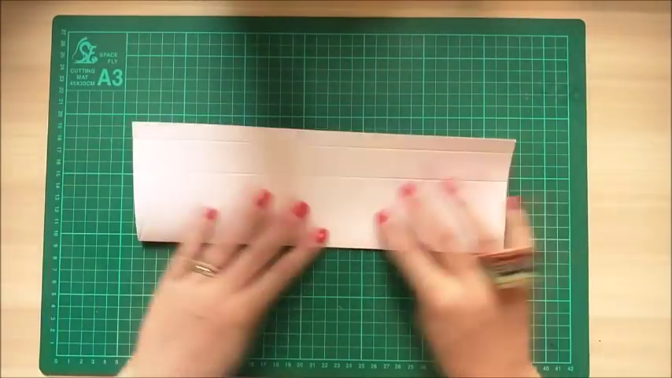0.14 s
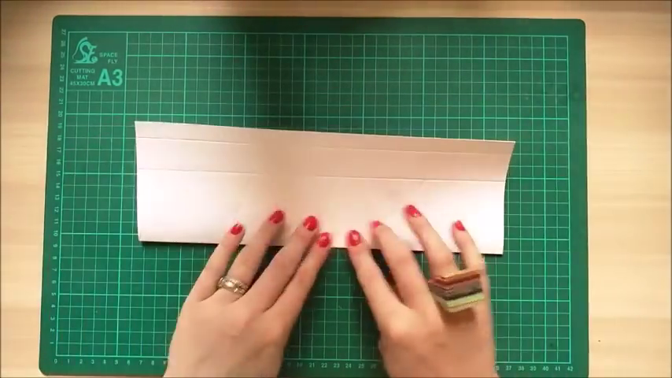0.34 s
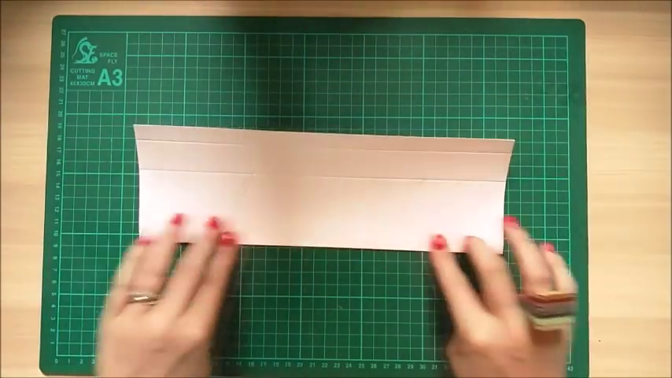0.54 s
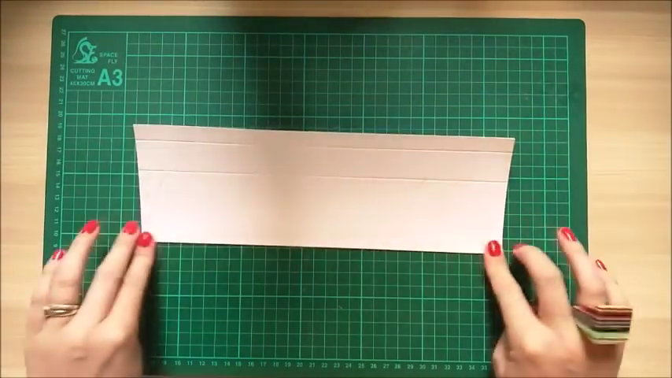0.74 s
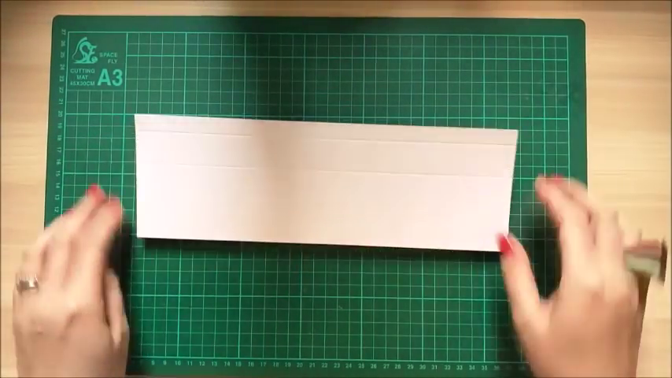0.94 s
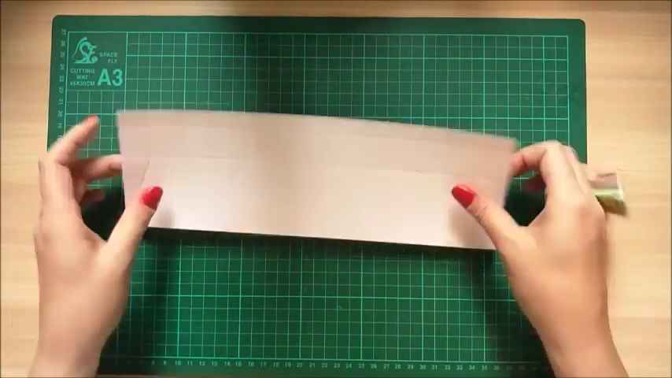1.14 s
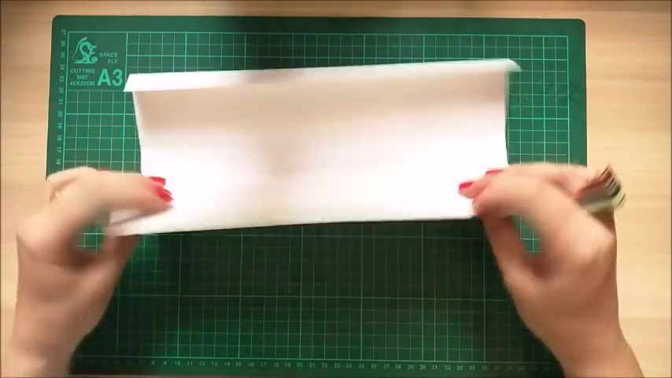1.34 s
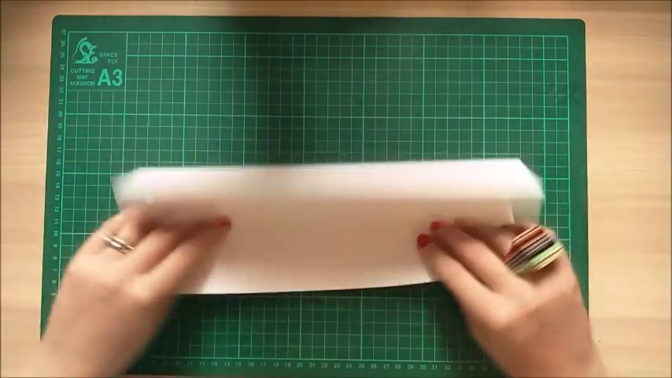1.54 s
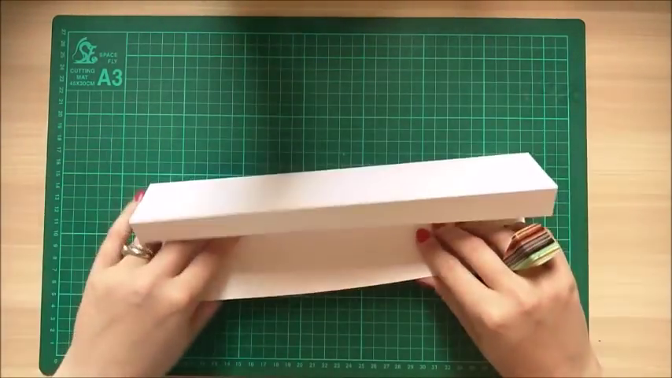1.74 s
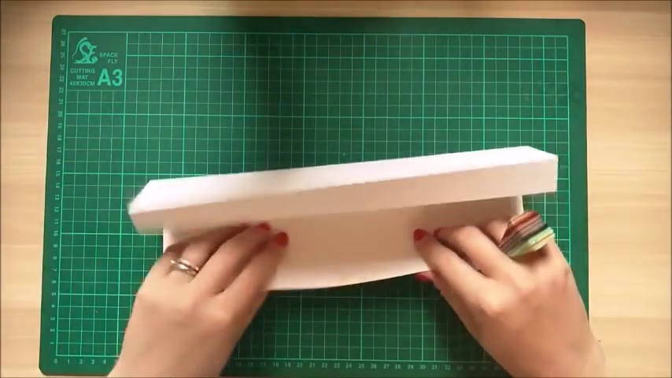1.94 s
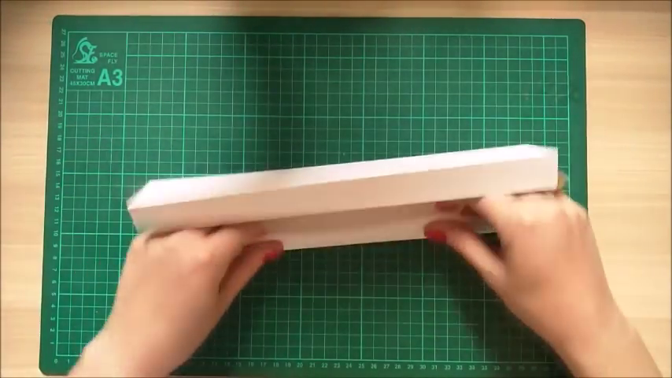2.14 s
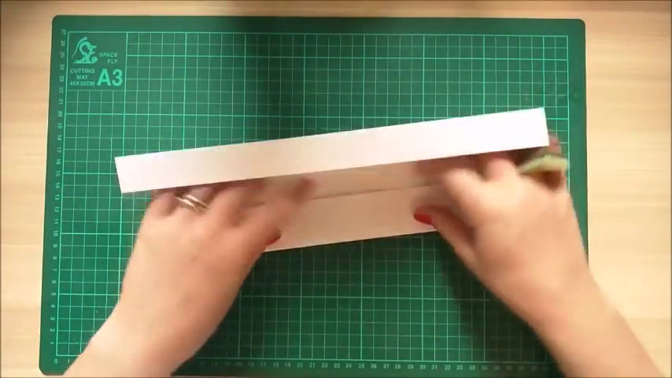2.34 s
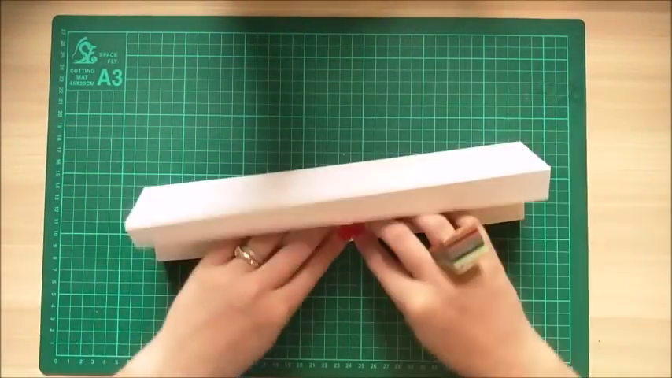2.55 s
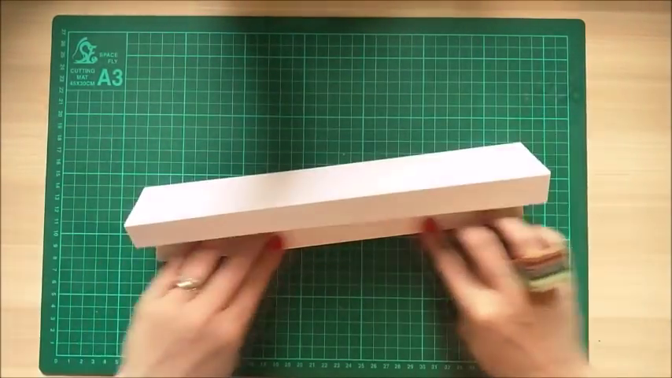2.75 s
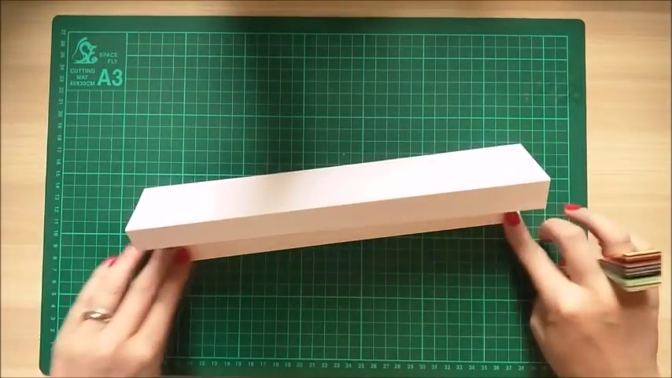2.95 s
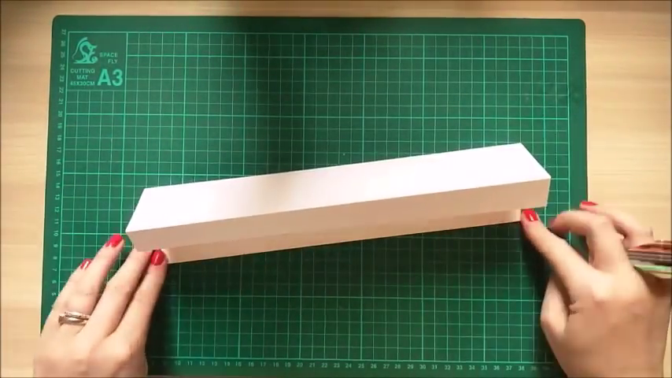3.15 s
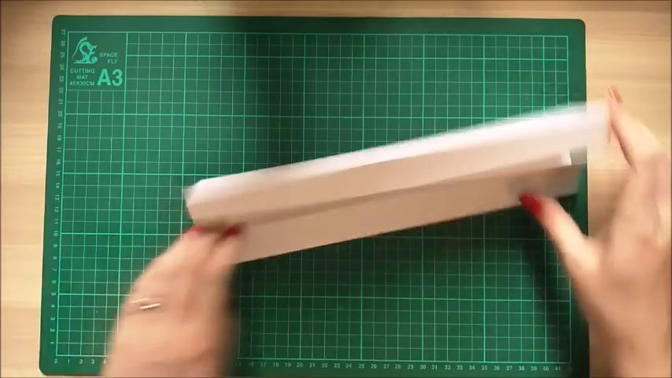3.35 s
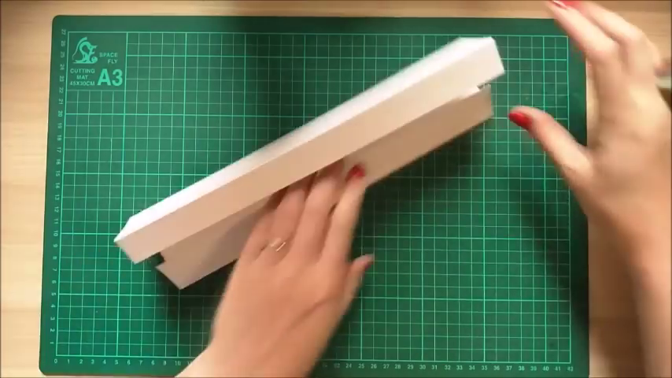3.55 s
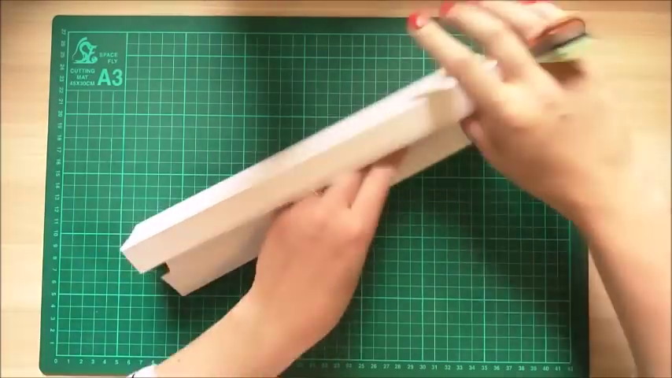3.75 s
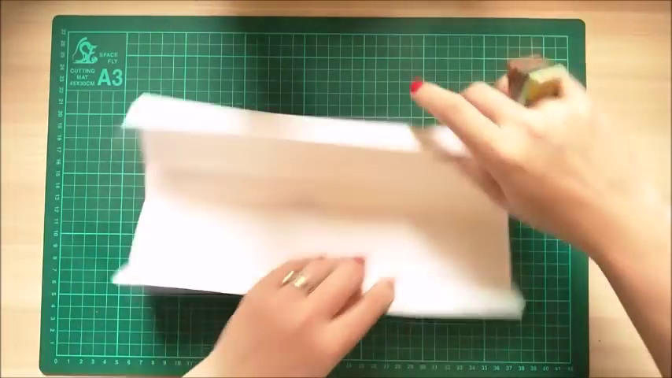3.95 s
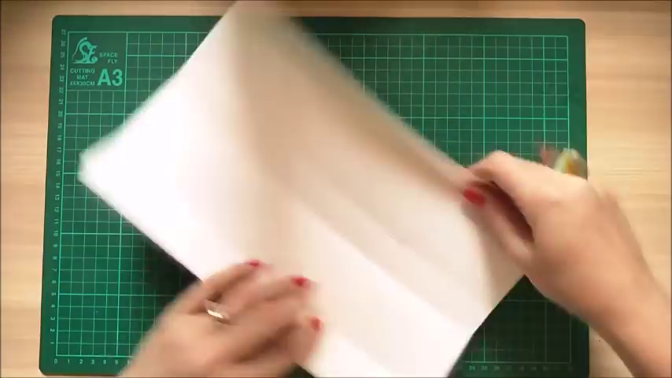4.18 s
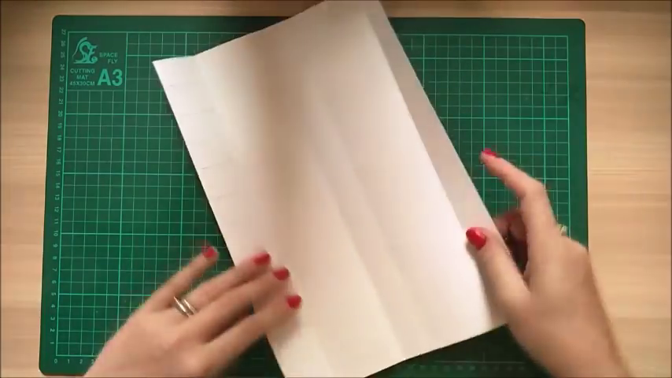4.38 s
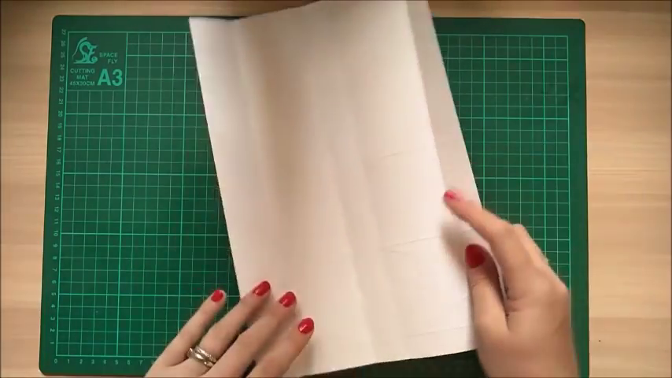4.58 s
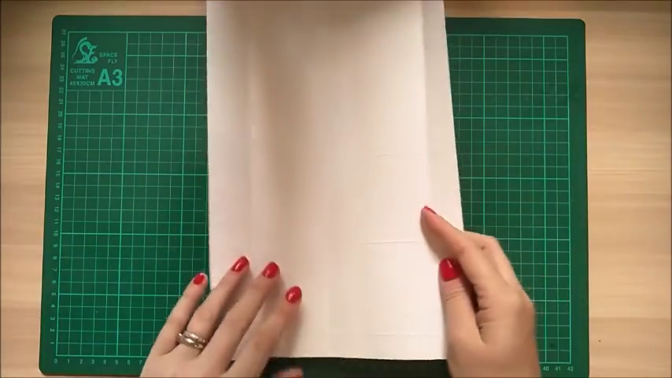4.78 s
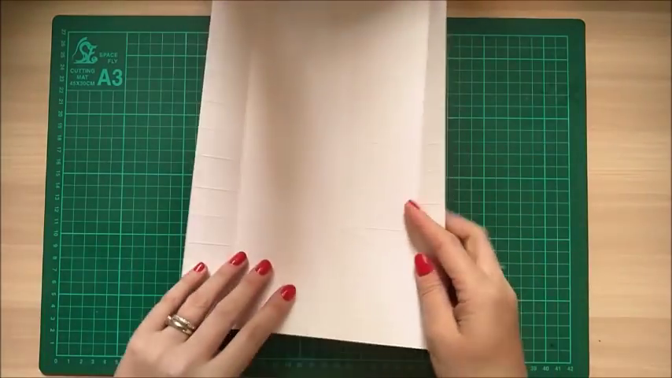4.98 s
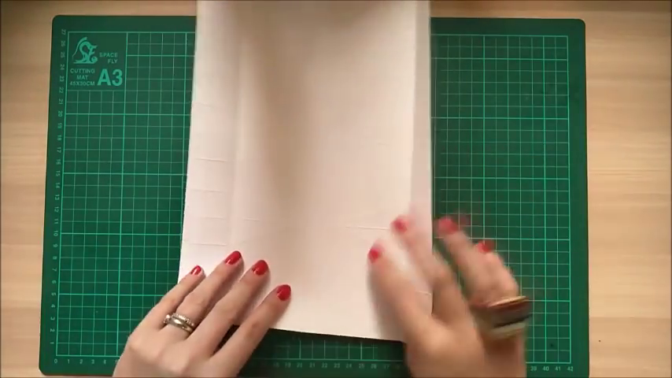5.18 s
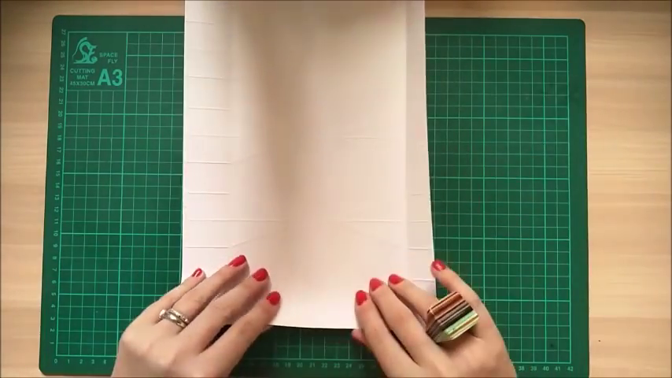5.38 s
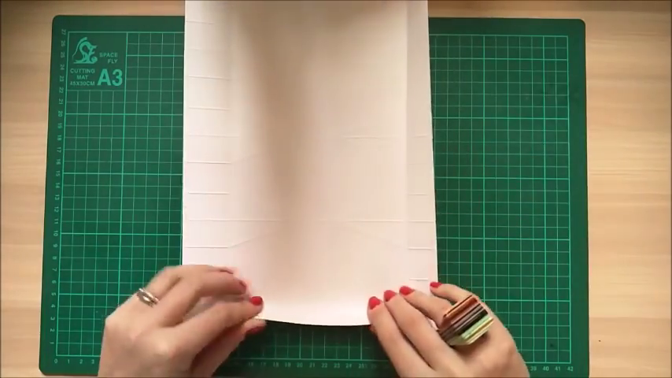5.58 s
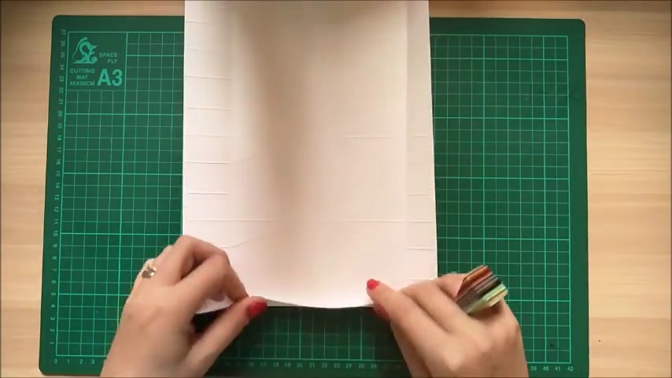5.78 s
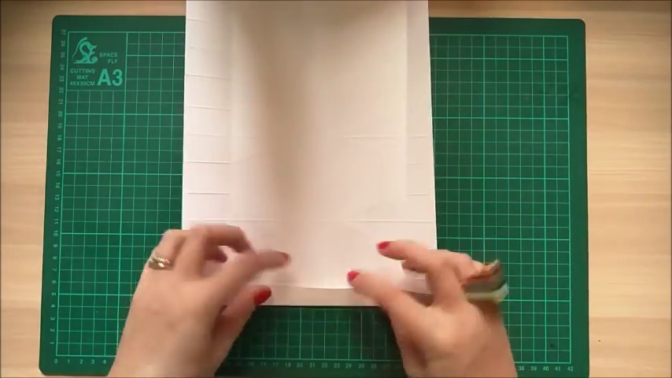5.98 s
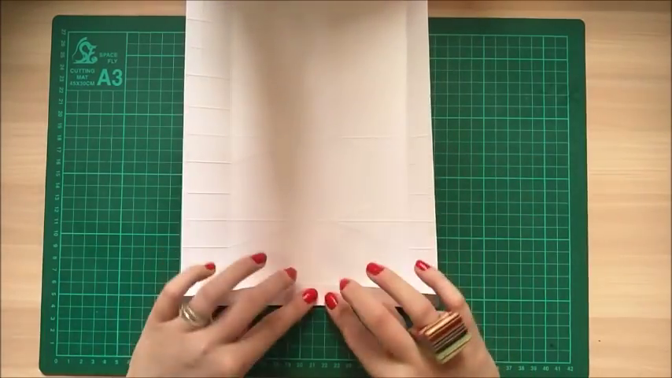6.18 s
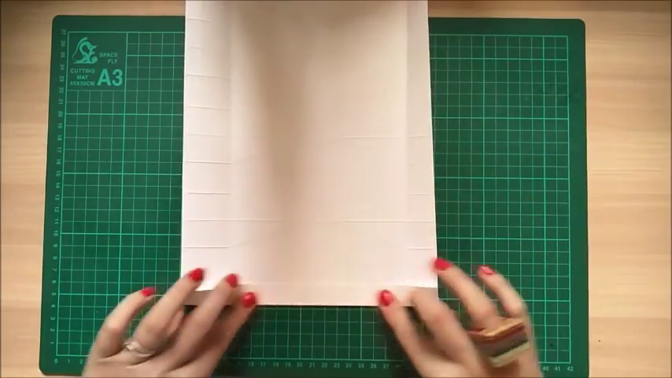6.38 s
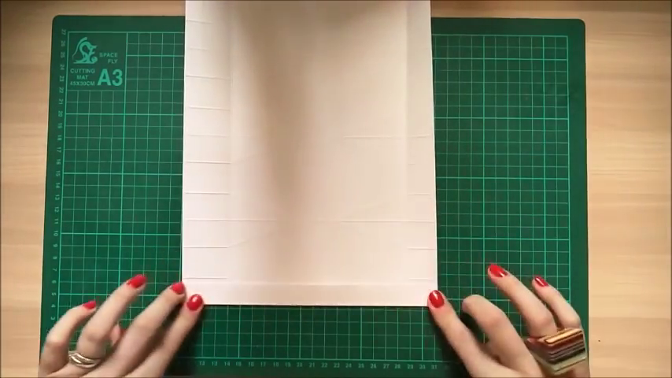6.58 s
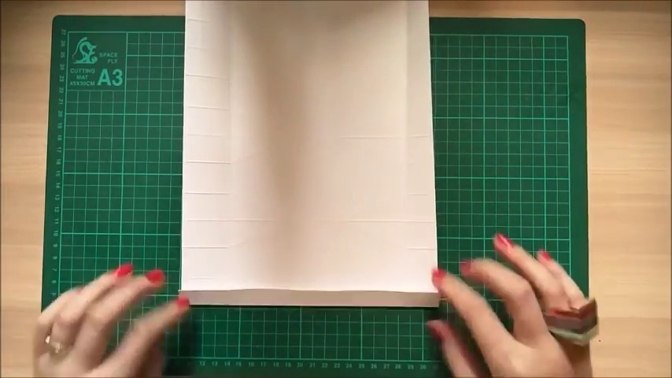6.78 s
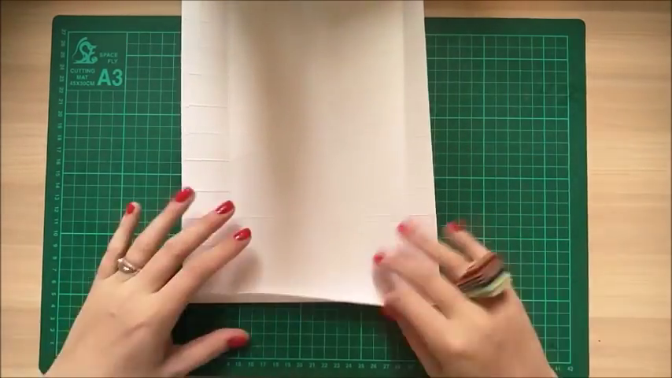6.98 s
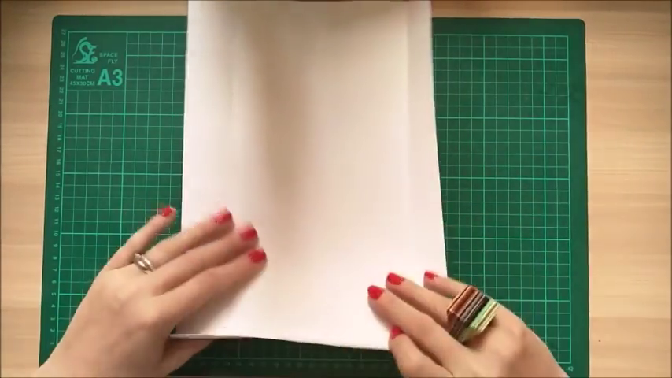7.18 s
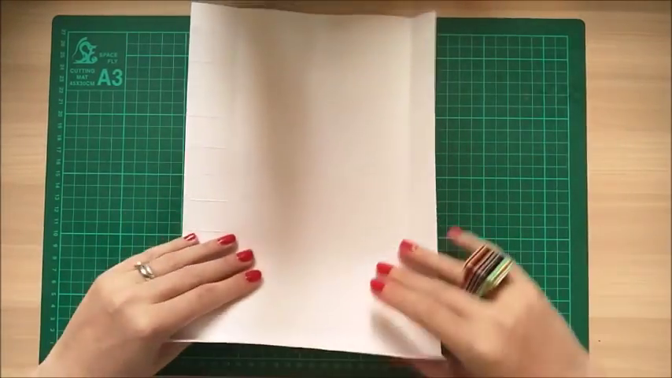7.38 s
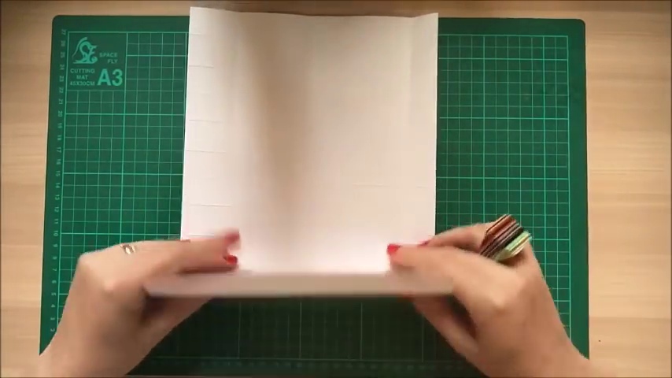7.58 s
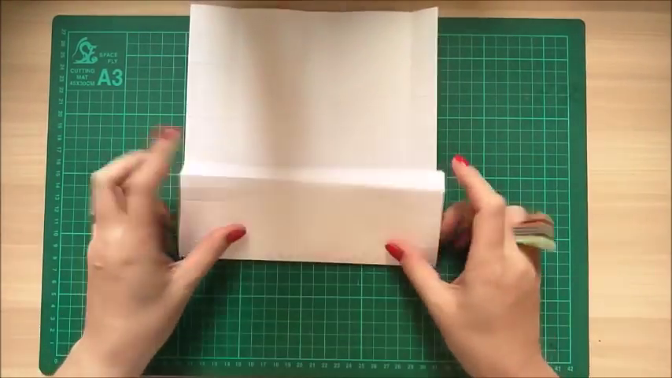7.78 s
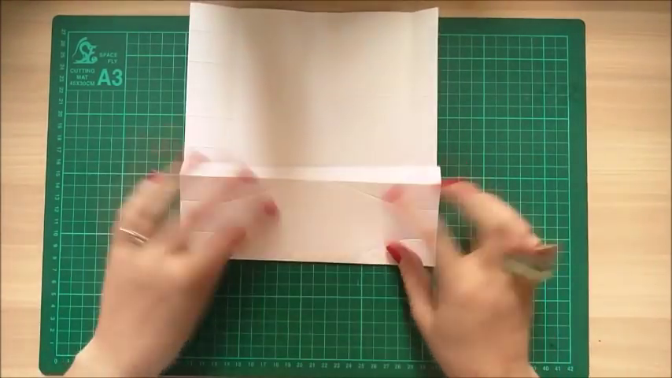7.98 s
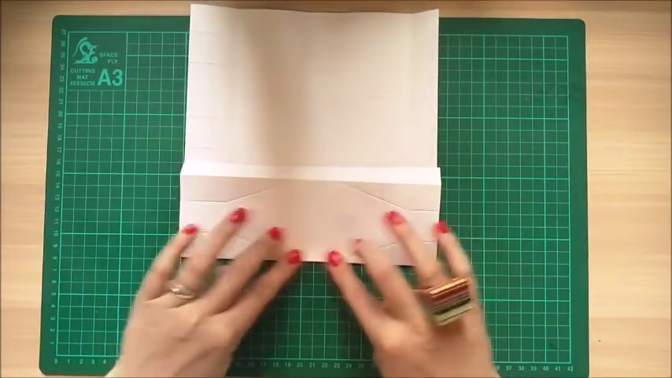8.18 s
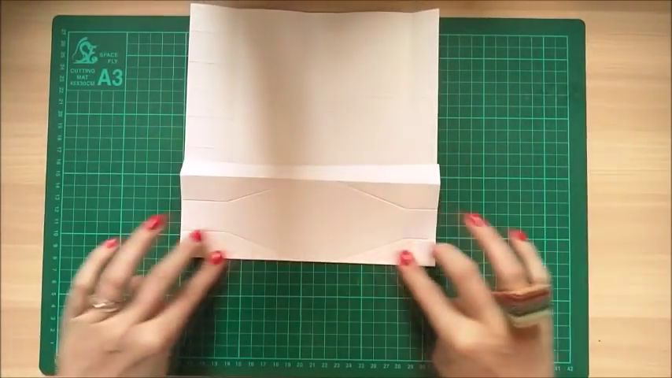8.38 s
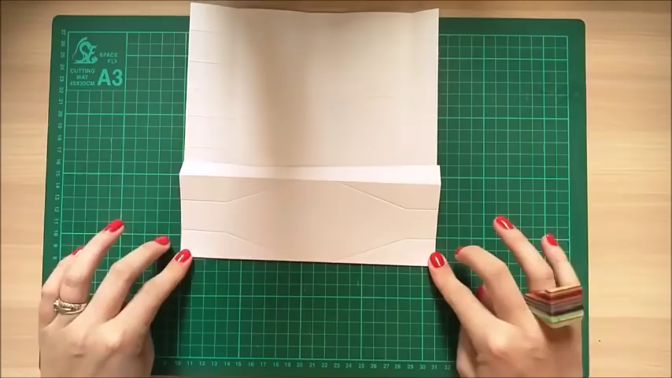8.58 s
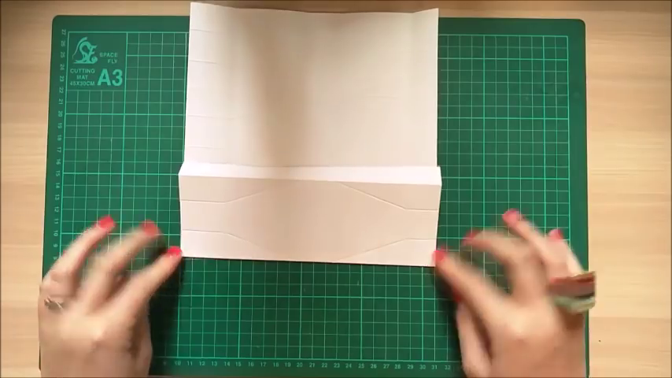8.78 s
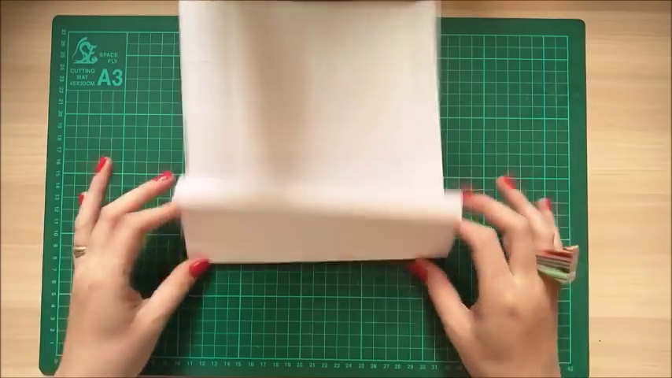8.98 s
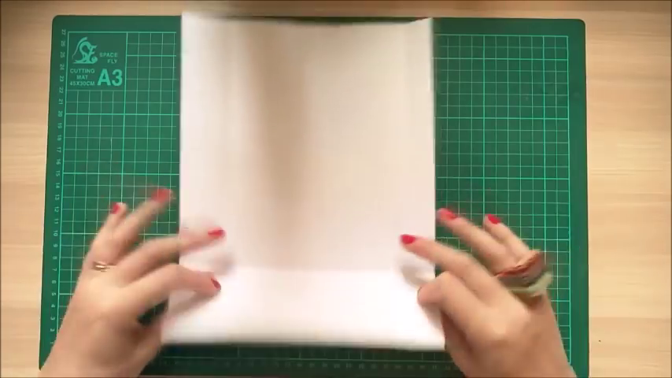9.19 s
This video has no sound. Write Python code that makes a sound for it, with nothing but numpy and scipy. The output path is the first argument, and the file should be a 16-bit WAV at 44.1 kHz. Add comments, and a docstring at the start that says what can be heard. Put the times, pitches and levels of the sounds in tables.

```python
"""Card scrapes and taps on a cutting mat, close to a stereo microphone in a small live room.
Hands fold the scored sheet: fingertips hiss along the creases, its edges catch on the mat,
and edges and fingernails tap down with a clack, a thud and a tick. Curled into an open tube,
the card rings hollow; later a folded flap colours the rubbing. Faint air noise lies underneath."""
import sys
import numpy as np
from scipy import signal
from scipy.fft import rfft, irfft
from scipy.io import wavfile
from scipy.ndimage import uniform_filter1d

SR = 44100
rng = np.random.default_rng(int(sys.argv[2]) if len(sys.argv) > 2 else 0)


def persist_wave(psi):
    """Save psi, clipped to +-1, as 16-bit WAV."""
    counts = np.round(np.clip(psi, -1, 1) * 32767).astype(np.int16)
    wavfile.write(sys.argv[1], SR, np.atleast_2d(counts).T)


N = 407043
TIME = np.arange(N) / SR
HAND_TIME = np.arange(0, N, 32) / SR  # a coarser clock for hand movements


def gain_of(db):
    """Decibels to amplitude."""
    return np.exp(np.asarray(db) * (np.log(10) / 20))


def unit_rms(x):
    """Scales to rms 1."""
    return x / np.sqrt(np.mean(x ** 2) + 1e-20)


def power_sum(*levels):
    """Amplitudes of unrelated noises, added in power."""
    return np.sqrt(sum(level ** 2 for level in levels))


def at_hz(rows, hz, column=1):
    """One column of a spectrum table, read on a log-frequency axis."""
    table = np.transpose(rows)
    return np.interp(np.log(hz + 1), np.log(table[0] + 1), table[column])


def follow(rows, column=1):
    """One column of a curve at every sample, held beyond its ends."""
    table = np.transpose(rows)
    return np.interp(TIME, table[0], table[column])


def add(mix, start_s, sound):
    """Mixes a sound in at its start time."""
    part = mix[max(round(start_s * SR), 0):][:len(sound)]
    part += sound[:len(part)]


def colour(x, spectrum, size=2048):
    """Passes x through a body that rings with the given spectrum, at minimum phase."""
    log_gain = np.log(gain_of(at_hz(spectrum, abs(np.fft.fftfreq(size, 1 / SR)))))
    response = np.fft.ifft(np.exp(np.conj(signal.hilbert(log_gain)))).real
    return signal.oaconvolve(x, response)[:len(x)]


def waver(rate_hz):
    """Slow random drift of rms 1, up to about rate_hz."""
    hz = np.fft.rfftfreq(N, 1 / SR)[:1000]
    noise = rng.standard_normal((len(hz), 2)) @ [1, 1j]
    spectrum = noise / np.sqrt(1 + (hz / rate_hz) ** 4) * hz / (hz + rate_hz / 4)
    drift = unit_rms(irfft(spectrum, 8192))
    return np.interp(TIME, np.linspace(0, N / SR, len(drift)), drift)


def burst(spectrum, t60, crack=0, size=8192):
    """A contact chatters and dies away, with an optional opening crack; rms 1 over its loudest 5 ms."""
    t = np.arange(size) / SR
    force = gain_of(-60 * t / max(t60, 0.004)) + crack * np.exp(-t / 0.0015)
    chatter = rng.choice([-1, 1], size)
    for _ in range(4):  # even out spectrum and loudness in turn
        white = irfft(np.exp(1j * np.angle(rfft(chatter * force))))
        chatter = white / np.sqrt(abs(uniform_filter1d(white ** 2, size=24)) + 1e-20)
    sound = colour(chatter * force, spectrum)
    return sound / np.sqrt(uniform_filter1d(sound ** 2, size=220).max())


def friction(slips_per_s, spread_db, smooth, uneven_db):
    """Fibres catch and slip: tiny clicks of scattered size over a smooth hiss, under uneven pressure."""
    sizes = gain_of(spread_db * np.minimum(rng.exponential(1, N), 4))
    slips = sizes * rng.choice([-1, 1], N) * (rng.random(N) < slips_per_s / SR)
    pressure = gain_of(uneven_db * waver(rate_hz=25))
    return (unit_rms(slips) + smooth * rng.standard_normal(N)) * pressure


def wandering_dips(x, patchy_db):
    """Ripples in the spectrum wander over time, leaving changing dips."""
    bands = signal.stft(x, SR, nperseg=512)[2]
    ripple = uniform_filter1d(rng.standard_normal(bands.shape), size=3, axis=0)
    ripple = unit_rms(uniform_filter1d(ripple, size=9, axis=1))
    return signal.istft(bands * gain_of(patchy_db * np.minimum(ripple, 0.5)), SR)[1][:N]


# The tone of the air. Each row: frequency in Hz, level in dB.
AIR_EQ = [(25, -35), (90, -18.5), (170, 2), (280, 7.5), (600, 2.5), (1500, -2.5), (4000, -27), (16000, -3)]

def room_tone():
    """A faint, steady bed of air noise, partly shared by both microphones."""
    shared, left, right = (unit_rms(colour(rng.standard_normal(N), AIR_EQ)) for _ in range(3))
    return gain_of(-70.5) * np.array([shared + 1.8 * left, shared + 1.3 * right])


# The room's tail. Each row: frequency in Hz, t60 in seconds, level in dB, left-right likeness 0-1.
REVERB_BANDS = [(143, 0.3, 4, 0.67), (424, 0.37, 0, 0.84), (1180, 0.36, 0, 0), (3900, 0.22, 0.5, 0),
                (6570, 0.18, -7.5, 0), (11800, 0.16, -22, 0.7)]

def room(x, size=32768, echoes_per_s=4000):
    """Dense reflections die band by band, alike at both microphones in the bass."""
    echoes = rng.standard_normal((2, size)) * (rng.random((2, size)) < echoes_per_s / SR)
    hz, t, bands = signal.stft(echoes / echoes.std(), SR, nperseg=256)
    t60, wet_db, alike = (at_hz(REVERB_BANDS, hz, column)[:, None] for column in (1, 2, 3))
    bands[1] = alike * bands[0] + np.sqrt(1 - alike ** 2) * bands[1]
    equal_energy = np.sqrt(2 * np.log(1000) / (t60 * SR))
    onset = np.minimum(t / 0.0027, 1)
    bands *= gain_of(wet_db - 60 * t / t60) * equal_energy * onset
    tail = signal.istft(bands, SR, nperseg=256)[1]
    return signal.oaconvolve(np.float32(x)[None], np.float32(tail), axes=1)[:, :N]


def moving_room(x):
    """The hands move about, so the sound drifts between four patterns of reflections."""
    paths = np.array([waver(rate_hz=5.87) for _ in range(4)])
    return sum(room(x * share) for share in paths / np.linalg.norm(paths, axis=0))


# The table's low body. Each row: frequency in Hz, level in dB.
TABLE_EQ = [(25, 3), (95, -3), (175, 8), (260, -4), (600, -42)]
# Firm pushes through the mat. Each row: start in seconds, level in dB.
TABLE_BUMPS = [(0.242, -64), (1.503, -61), (1.68, -67), (4.042, -70), (9.14, -55)]

def table_bumps(rise_s=0.004):
    """The weight of the hands lands on the heavy table, which answers late with a soft, low push."""
    out = np.zeros(N)
    for start, db in TABLE_BUMPS:
        push = burst(TABLE_EQ, t60=0.124)
        onset = np.minimum(np.arange(len(push)) / SR / rise_s, 1)
        add(out, start, gain_of(db) * push * onset)
    return out


# The hollow modes of the curled card. Each row: frequency in Hz, level in dB, t60 in seconds.
TUBE_MODES = [(324, -5.5, 0.045), (371.5, 3.5, 0.039), (460, -0.5, 0.081), (611, 2.5, 0.033),
              (734, -0.5, 0.043), (770, -7, 0.065), (1175, -19.5, 0.077)]

def tube_ring(tilt_db=0, strike_spread_db=1.5, grip_detune=0.019):
    """One blow rings the tube: hardness tilts the modes, the spot favours some, the grip retunes them."""
    t = np.arange(SR // 5) / SR
    modes = np.zeros(len(t))
    for hz, db, t60 in TUBE_MODES:
        level_db = db + tilt_db * np.log2(hz) + strike_spread_db * rng.standard_normal()
        tuned_hz = hz * (1 + grip_detune * rng.standard_normal())
        modes += gain_of(level_db - 60 * t / t60) * np.sin(2 * np.pi * (tuned_hz * t + rng.random()))
    low_cut = signal.butter(2, 260, "high", fs=SR, output="sos")
    return signal.sosfilt(low_cut, modes * (1 - np.exp(-t / 0.0011)))


# Hollow knocks. Each row: start in seconds, level in dB, hardness as a tilt in dB per octave.
TUBE_KNOCKS = [(1.499, -46.5, 1.5), (1.6757, -44, 17), (1.701, -49, 7), (1.911, -62.5, 6),
               (1.992, -58.5, 8.5), (2.125, -44.5, 16.5), (2.136, -54, -1), (2.158, -54, 1),
               (2.295, -52, 1.5), (2.401, -58.5, -21), (2.551, -53, 2), (3.235, -55, -2), (3.378, -63, 5),
               (3.444, -58, 2), (3.484, -53, 2), (3.511, -54.5, -9), (3.589, -42.5, 10), (3.6, -45, 4),
               (3.625, -50, -1), (3.644, -49, 4), (3.927, -55, 12), (4.011, -59, -2), (4.858, -61, -8),
               (6.401, -72, 3)]

def tube_knocks():
    """The bent card rings as it is bumped and set down on the mat."""
    out = np.zeros(N)
    for start, db, tilt_db in TUBE_KNOCKS:
        add(out, start, gain_of(db) * unit_rms(tube_ring(tilt_db)))
    return out


HISS, SCRAPE, FLEX = 2, 3, 4  # level columns of the hand movements

def envelope(shape, moves, column):
    """The joint amplitude of all hand movements of one kind, from one of their level columns."""
    levels = (gain_of(move[column]) * shape(move[0], move[1]) for move in moves)
    return np.interp(TIME, HAND_TIME, power_sum(*levels))


# The hands shift or turn the sheet.
# Each row: start and length in seconds, then hiss, scrape and flex levels in dB.
SHEET_DRAGS = [(0.0, 0.12, -35, -55, -53.5), (0.117, 0.23, -35, -48, -57), (0.934, 0.056, -38.5, -53, -54),
               (1.182, 0.14, -41, -51, -53.5), (1.29, 0.15, -37.5, -60, -65),
               (1.488, 0.18, -37, -48.5, -52), (1.633, 0.12, -35, -47.5, -51),
               (1.854, 0.36, -38.5, -58, -62), (2.14, 0.15, -42.5, -62, -58.5),
               (2.253, 0.19, -39, -54.5, -57), (2.358, 0.1, -39, -50.5, -46), (2.494, 0.13, -35, -55, -60),
               (3.378, 0.12, -30, -52, -53), (3.559, 0.15, -35.5, -52.5, -52),
               (3.784, 0.068, -30, -46.5, -51), (3.868, 0.15, -38, -49, -44),
               (3.987, 0.14, -33.5, -54, -59), (4.278, 0.18, -36.5, -50, -59), (4.445, 0.25, -41, -54, -83),
               (4.775, 0.25, -45, -57, -69), (5.041, 0.045, -44, -52, -58.5),
               (5.149, 0.316, -42.5, -57.5, -66.5), (5.453, 0.31, -42.5, -66.5, -89),
               (5.79, 0.28, -49, -72, -73), (6.16, 0.11, -40.5, -78, -69.5), (7.067, 0.085, -39, -52, -59),
               (7.201, 0.2, -39.5, -51.5, -60.5), (7.432, 0.17, -39, -49, -58),
               (7.622, 0.35, -38.5, -58, -66), (7.749, 0.2, -29.5, -41.5, -53),
               (8.037, 0.17, -37.5, -54.5, -72), (9.071, 0.11, -37, -50, -49.5)]

def drag(start, length, attack_s=0.036, ease_db=-1.5, release_s=0.041):
    """A drag takes hold, eases off as it goes, and lets go."""
    t = np.maximum(HAND_TIME - start, 0)
    hold = gain_of(ease_db * np.minimum(t / length, 1))
    release = np.exp(-np.maximum(t - length, 0) / release_s)
    return np.minimum(t / attack_s, 1) * hold * release


# Quick finger brushes. Each row: peak time and half-width in seconds, hiss and scrape levels in dB.
FINGER_FLICKS = [(0.008, 0.012, -29.5, -39), (0.311, 0.0093, -36.5, -36), (0.961, 0.0023, -44, -49),
                 (0.994, 0.006, -33.5, -41.5), (1.196, 0.011, -36.5, -46.5), (1.374, 0.014, -26, -67),
                 (1.822, 0.013, -36, -46.5), (1.995, 0.026, -36.5, -69), (2.178, 0.019, -29, -43.5),
                 (2.274, 0.0043, -35, -54), (2.464, 0.011, -30.5, -52), (3.455, 0.015, -31, -64),
                 (3.905, 0.0043, -34, -59), (4.059, 0.0089, -30.5, -58), (4.245, 0.016, -40, -69),
                 (4.65, 0.0082, -40.5, -64), (5.12, 0.023, -39.5, -62), (5.6, 0.028, -38.5, -75),
                 (5.76, 0.015, -42, -59), (5.88, 0.018, -44.5, -68), (5.935, 0.015, -41, -56),
                 (6.114, 0.0095, -42, -56), (6.869, 0.011, -42.5, -64), (7.089, 0.011, -25.5, -68),
                 (8.003, 0.0029, -31.5, -36), (8.349, 0.0068, -38, -41), (8.379, 0.0046, -29, -44),
                 (8.893, 0.0055, -34.5, -72), (9.067, 0.0087, -29.5, -46.5), (9.134, 0.0047, -26, -38)]

def flick(peak, width):
    """A brush swells to its fastest moment and dies away again."""
    nearness = np.exp(-abs((HAND_TIME - peak) / width))
    return 2 * nearness / (1 + nearness ** 2)


# Long, firm strokes that press a crease flat.
# Each row: start and length in seconds, then hiss, scrape and flex levels in dB.
CREASE_STROKES = [(0.39, 0.52, -35, -56, -69), (2.698, 0.45, -33.5, -63.5, -68.5),
                  (6.312, 0.43, -36, -64, -78), (8.246, 0.39, -38, -61, -71)]

def crease(start, length, skew=0.87, speed_power=0.86):
    """The hand speeds up and slows down along the fold; loudness goes as a power of its speed."""
    progress = np.clip((HAND_TIME - start) / length, 0, 1)
    speed = abs(np.sin(np.pi * progress ** skew))
    return speed ** speed_power


# The dull body of the flat sheet. Each row: frequency in Hz, level in dB.
SHEET_EQ = [(25, -48), (95, -55), (140, -17), (185, -4.5), (280, 2.5), (450, 2), (750, -4.5), (1200, -12),
            (3000, -31.5)]
# How far the card is curled. Each row: time in seconds, share from 0 (flat) to 1 (tube).
CURL_CURVE = [(1.7, 0.9), (2.2, 0.45), (3.7, 0.86), (4.15, 0.37)]

def sheet_flexing(resting_db=-78):
    """Small slips shake the whole sheet: dull when it lies flat, hollow when it is curled."""
    grain = friction(slips_per_s=250, spread_db=5.5, smooth=0.6, uneven_db=0.5)
    grain = wandering_dips(grain, patchy_db=10.5)
    flat = unit_rms(colour(grain, SHEET_EQ))
    hollow = unit_rms(signal.oaconvolve(grain, tube_ring())[:N])
    curl = follow(CURL_CURVE)
    level = power_sum(envelope(drag, SHEET_DRAGS, FLEX), envelope(crease, CREASE_STROKES, FLEX),
                      gain_of(resting_db))
    return (np.sqrt(1 - curl) * flat + np.sqrt(curl) * hollow) * level


def resonate(x, hz, width_hz):
    """A fixed or moving resonance of gain 1."""
    carrier = np.exp(2j * np.pi * np.cumsum(hz * np.ones(N)) / SR)
    pole = np.exp(-np.pi * width_hz / SR)
    return 2 * (carrier * signal.lfilter([1 - pole], [1, -pole], x / carrier)).real


def tuned_rub(hz, width_hz):
    """A finger grips in short catches, heard through a narrow air gap that resonates and cuts the bass."""
    grain = friction(slips_per_s=1500, spread_db=3, smooth=0.7, uneven_db=3.5)
    thin = np.diff(grain, prepend=0)
    return unit_rms(resonate(resonate(thin, hz, width_hz), hz, width_hz))


# One rising rub. Each row: time in seconds, level in dB, centre frequency in Hz.
EDGE_SWEEP = [(5.22, -73, 2480), (5.29, -45.5, 2620), (5.37, -59, 2780), (5.48, -55, 3580),
              (5.62, -49.5, 4840), (5.75, -62, 5170)]

def edge_rub():
    """Fingers draw out to the edge of the sheet, and the rub climbs in pitch."""
    touching = (TIME > EDGE_SWEEP[0][0]) & (TIME < EDGE_SWEEP[-1][0])
    rub = tuned_rub(hz=follow(EDGE_SWEEP, column=2), width_hz=2700)
    return rub * gain_of(follow(EDGE_SWEEP)) * touching


# Rubs on the folded flap. Each row: peak time and half-width in seconds, level in dB.
FLAP_RUBS = [(7.813, 0.014, -39.5), (7.96, 0.026, -45.5), (8.1, 0.01, -45), (8.382, 0.0058, -37),
             (8.57, 0.063, -59.5), (8.898, 0.0065, -47), (9.142, 0.0084, -35.5)]

def flap_rubs():
    """The air gap under the flap gives each brush the same narrow ring."""
    return tuned_rub(hz=1880, width_hz=340) * envelope(flick, FLAP_RUBS, column=2)


# The three colours of a tap: card, mat and contact point. Each row: frequency in Hz, level in dB.
CLACK_EQ = [(200, -32), (560, -4.5), (1080, 5), (1290, 4.5), (1500, 8.5), (1800, 4), (2450, -2), (3700, -6),
            (6000, -16), (16000, -63)]
THUD_EQ = [(25, -23), (95, -29), (140, -15.5), (185, 0), (270, 8), (400, 5), (650, -0.5), (1100, -0.5),
           (3000, -15.5)]
TICK_EQ = [(500, -50), (2500, 5.5), (3600, 7.5), (8500, 8), (12000, 16), (16000, 4)]
# Edges and nails tapping down. Each row: start in seconds, clack level in dB, clack pitch in Hz,
# thud level in dB, tick level in dB, the tick's t60 in seconds.
TAP_HITS = [(0.018, -39.5, 1350, -43.5, -43, 0.14), (0.077, -37.5, 1610, -44.5, -28.5, 0.076),
            (0.105, -35, 1340, -46, -48, 0.016), (0.152, -28.5, 1440, -34, -49, 0.011),
            (0.16, -37, 1380, -44, -50, 0.02), (0.237, -35, 1400, -39, -41, 0.015),
            (0.244, -30, 1430, -32, -33, 0.02), (0.26, -24.5, 1730, -37, -22, 0.021),
            (0.975, -41, 1970, -53, -45, 0.025), (1.0815, -44, 1220, -48.5, -56, 0.042),
            (1.113, -63, 1350, -48.5, -44.5, 0.039), (1.1753, -52, 1920, -54, -45, 0.03),
            (1.4991, -24, 1560, -51, -24, 0.0046), (1.5002, -24.5, 1040, -57, -17, 0.0034),
            (1.5077, -44, 3600, -43, -46, 0.009), (1.6755, -24.5, 3580, -52, -24.5, 0.015),
            (2.1235, -33.5, 1210, -50, -25, 0.014), (2.273, -53, 4500, -65, -28, 0.026),
            (2.458, -43.5, 1230, -48, -37, 0.026), (2.552, -45, 2480, -51, -33, 0.16),
            (3.226, -63, 1540, -55.5, -44, 0.025), (3.5897, -38.5, 1770, -40, -24.5, 0.041),
            (4.0396, -30, 1680, -46, -26, 0.1), (4.1275, -41.5, 1290, -48.5, -31, 0.017),
            (4.232, -39.5, 1190, -68.5, -43, 0.027), (4.3494, -34.5, 1250, -46, -33, 0.025),
            (4.3914, -34, 1266, -44, -28.5, 0.055), (4.7548, -48, 1310, -67, -45.5, 0.12),
            (4.817, -41.5, 1130, -59, -45, 0.014), (5.004, -51, 1040, -51, -47, 0.027),
            (5.165, -56, 1100, -52.5, -55, 0.03), (5.2024, -45, 1570, -45.5, -29.5, 0.027),
            (5.331, -45, 2220, -60, -54, 0.018), (5.4252, -47, 2360, -57, -36.5, 0.015),
            (6.118, -48.5, 2320, -58, -46, 0.016), (6.1863, -52.5, 2140, -65, -36, 0.047),
            (6.8338, -75, 1390, -52, -43.5, 0.0047), (7.0527, -39, 2620, -52, -30, 0.025),
            (7.1763, -48.5, 1460, -53, -44, 0.27), (7.3628, -32, 1520, -46, -28, 0.0096),
            (7.907, -47, 1410, -43, -27, 0.027), (7.9308, -33, 1560, -48, -23, 0.022),
            (8.094, -43.5, 1860, -51, -40, 0.054), (8.156, -41, 1490, -55, -45, 0.027),
            (8.173, -47, 1750, -57, -33, 0.026), (9.058, -46.5, 1650, -47.5, -30.5, 0.062),
            (9.137, -30.5, 1770, -34.5, -43, 0.033)]

def taps(clack_eq_hz=1500):
    """Each tap ticks at the contact, while the struck patch of card clacks and the mat thuds for longer."""
    out = np.zeros(N)
    for start, clack_db, pitch_hz, thud_db, tick_db, t60 in TAP_HITS:
        patch = [(hz * pitch_hz / clack_eq_hz, db) for hz, db in CLACK_EQ]  # stiffer rings higher
        add(out, start, gain_of(clack_db) * burst(patch, t60 * 1.65, crack=0.083))
        add(out, start, gain_of(thud_db) * burst(THUD_EQ, t60 * 1.87))
        add(out, start, gain_of(tick_db) * burst(TICK_EQ, t60, crack=0.084))
    return out


# The rasp of card on the mat. Each row: frequency in Hz, level in dB.
MAT_EQ = [(300, -63.5), (700, -7), (1100, -3.5), (1900, 4), (2400, 2), (3500, 2), (5000, -0.5), (8000, -22),
          (16000, -85)]

def mat_scraping(catches_per_s=45, catch_gain=0.65, resting_db=-72.5):
    """Card edges drag over the mat with a coarse grain; now and then one catches with a small crackle."""
    grain = friction(slips_per_s=650, spread_db=2.0, smooth=0.38, uneven_db=1.5)
    catches = rng.standard_normal(N) * (rng.random(N) < catches_per_s / SR)
    crackle = unit_rms(colour(catches, CLACK_EQ)) + unit_rms(colour(catches, MAT_EQ))
    scrape = unit_rms(colour(grain, MAT_EQ)) + catch_gain * unit_rms(crackle)
    level = power_sum(envelope(drag, SHEET_DRAGS, SCRAPE), envelope(flick, FINGER_FLICKS, SCRAPE),
                      envelope(crease, CREASE_STROKES, SCRAPE), gain_of(resting_db))
    return unit_rms(wandering_dips(scrape, patchy_db=14.0)) * level


# Skin on card as the microphone hears it, with a bright peak near 12 kHz. Each row: frequency in Hz, level in
# dB.
SKIN_EQ = [(300, -50), (2000, -16.5), (4000, -12.5), (6500, -6.5), (8500, -3.5), (10500, 1.5), (12200, 5.5),
           (14000, 0.5), (16000, -7)]

def fingertips(resting_db=-57):
    """Dry skin on card: a fine hiss, smoother and airier when it runs firmly along a crease."""
    patchy_db = 3.5  # the hiss's dips stay shallow, so it stays fairly even
    grain = friction(slips_per_s=3500, spread_db=0.7, smooth=1.0, uneven_db=1.2)
    grainy = colour(wandering_dips(grain, patchy_db), SKIN_EQ)
    smooth = colour(wandering_dips(rng.standard_normal(N), patchy_db), SKIN_EQ)
    airy = np.diff(smooth, prepend=0)
    light_touch = power_sum(envelope(drag, SHEET_DRAGS, HISS), envelope(flick, FINGER_FLICKS, HISS),
                            gain_of(resting_db))  # resting hands never keep quite still
    firm_touch = envelope(crease, CREASE_STROKES, HISS)
    return unit_rms(grainy) * light_touch + unit_rms(airy) * firm_touch


# The right microphone's direct sound. Each row: frequency in Hz, level against the left in dB.
RIGHT_MIC_EQ = [(200, 0.5), (1000, -1.5), (2000, -3), (4000, -11), (6000, -18), (8500, -20), (12000, -30)]

def scene():
    """The direct treble reaches mostly the left microphone; the room reaches both."""
    card = fingertips() + mat_scraping() + sheet_flexing() + taps() + edge_rub()
    tube, flap = tube_knocks(), flap_rubs()
    direct = card + tube + flap
    # tube and flap open toward the microphone, so they sound drier
    reflected = moving_room(card + gain_of(-4) * tube + gain_of(-10) * flap)
    return np.array([direct, colour(direct, RIGHT_MIC_EQ)]) + reflected + table_bumps() + room_tone()


def record(dry):
    """A steep low-pass trims the very top of the treble."""
    low_pass = signal.firwin(511, 15800, window=("kaiser", 9), fs=SR)
    return signal.oaconvolve(dry, low_pass[None], "same")


dry = scene()
out = record(dry)
persist_wave(out)
```